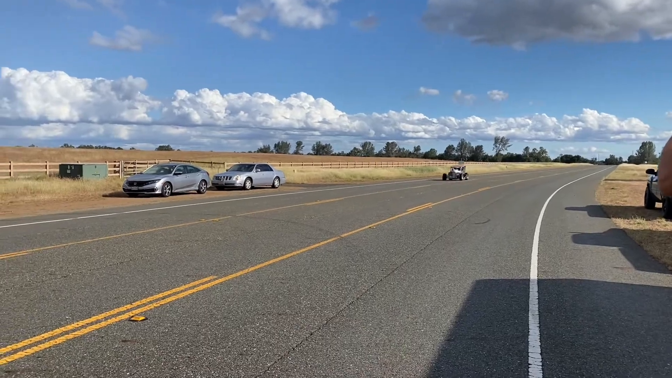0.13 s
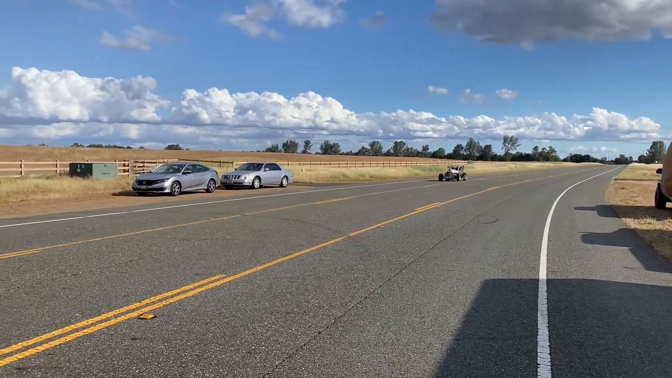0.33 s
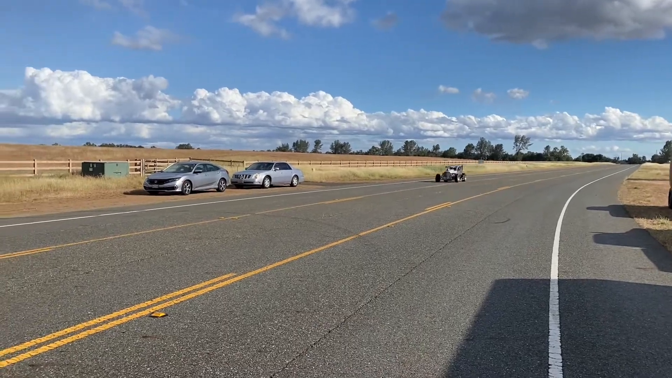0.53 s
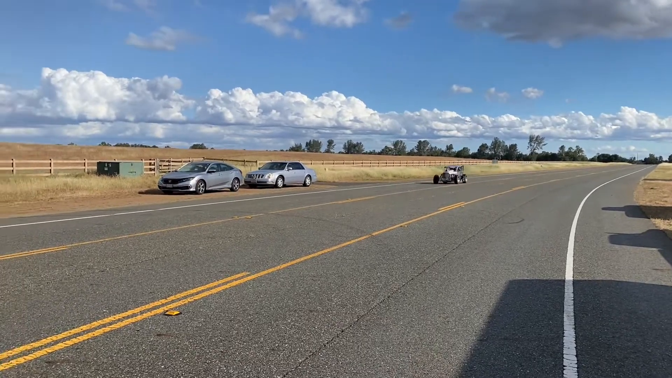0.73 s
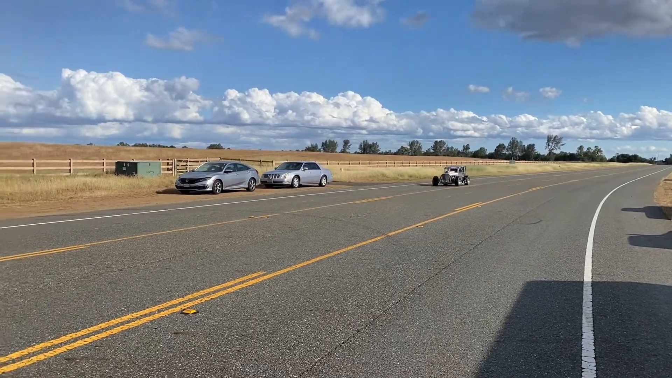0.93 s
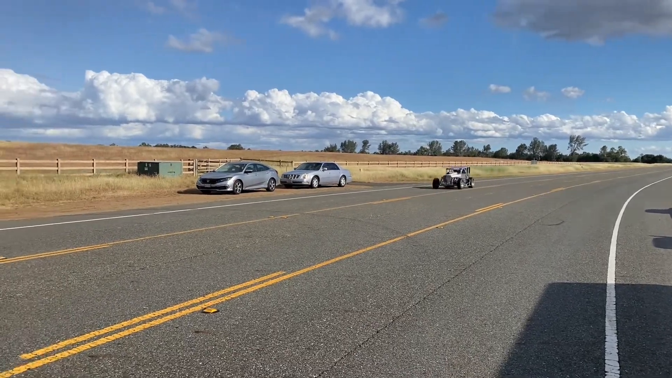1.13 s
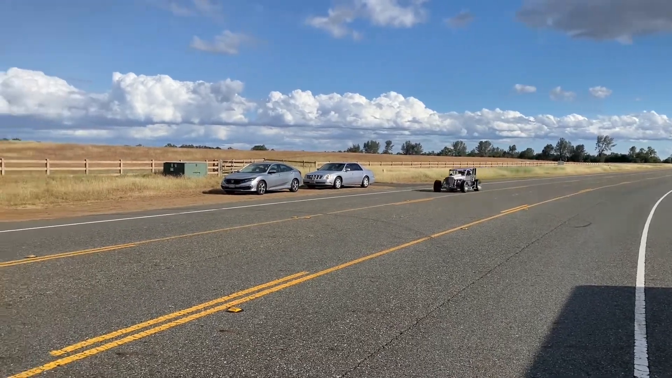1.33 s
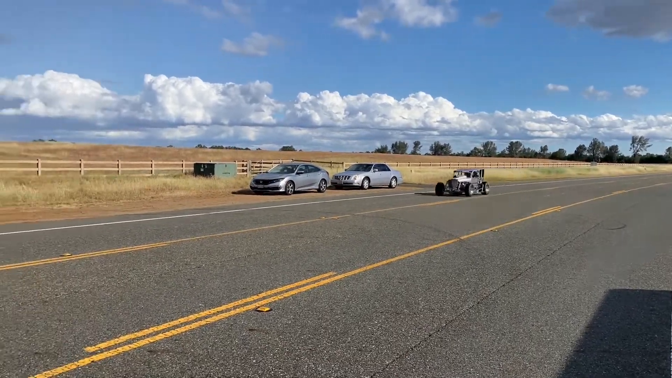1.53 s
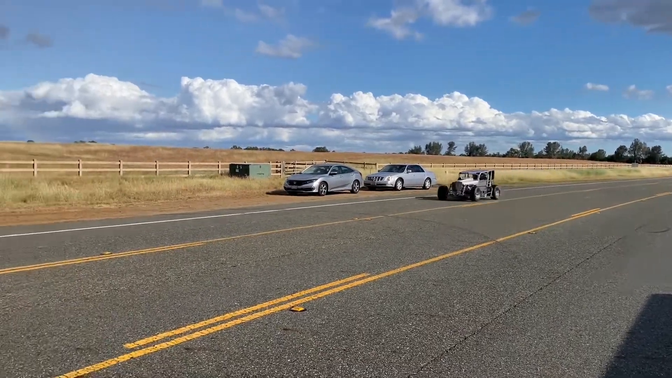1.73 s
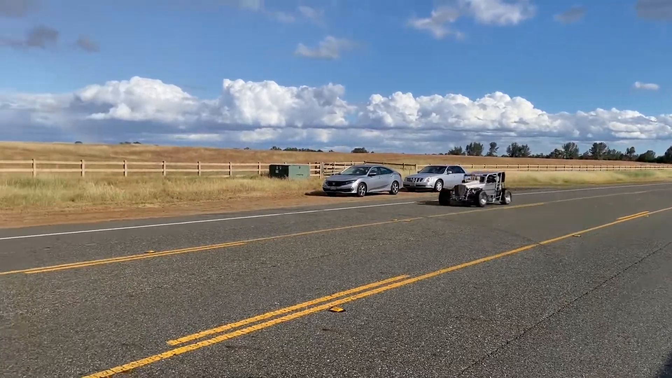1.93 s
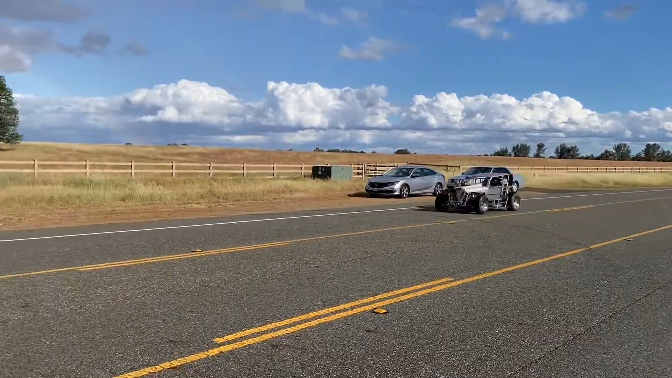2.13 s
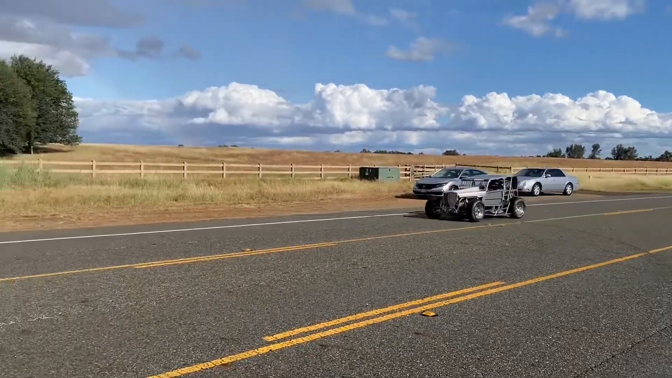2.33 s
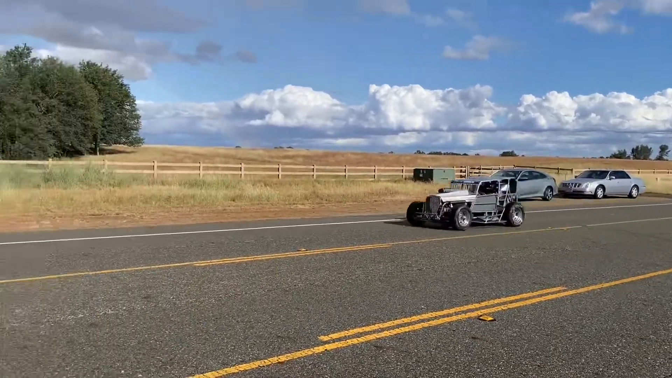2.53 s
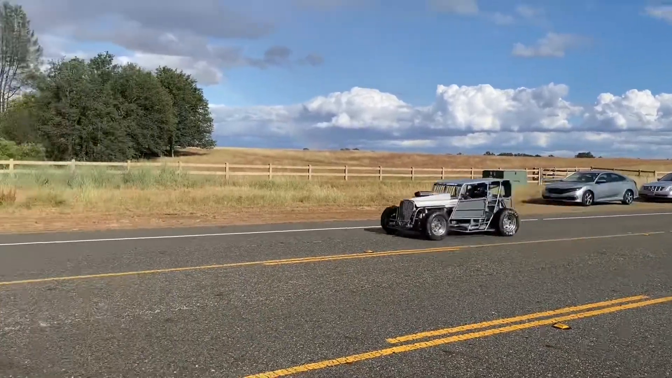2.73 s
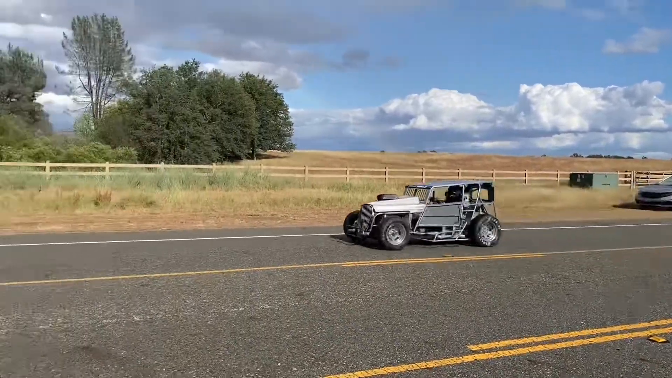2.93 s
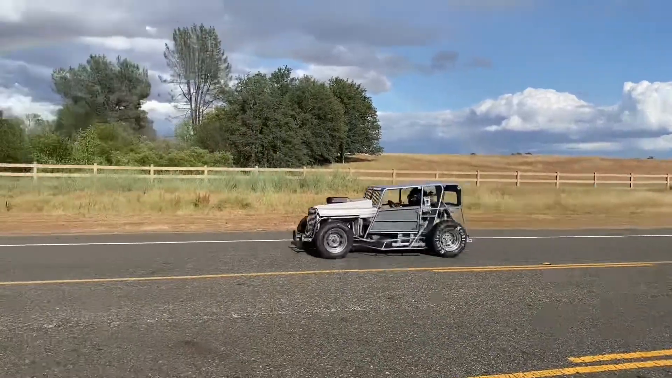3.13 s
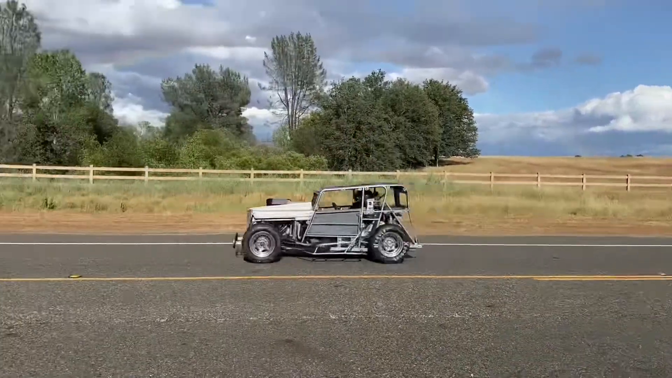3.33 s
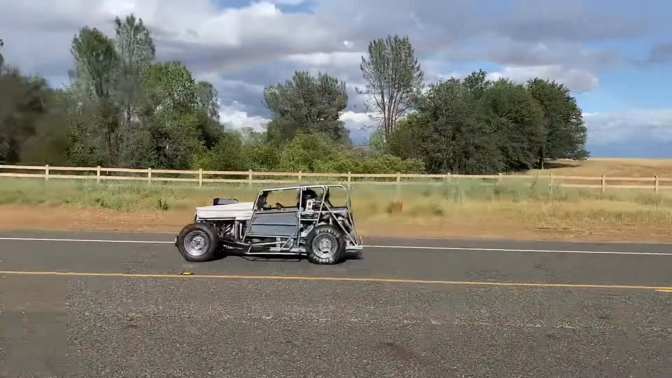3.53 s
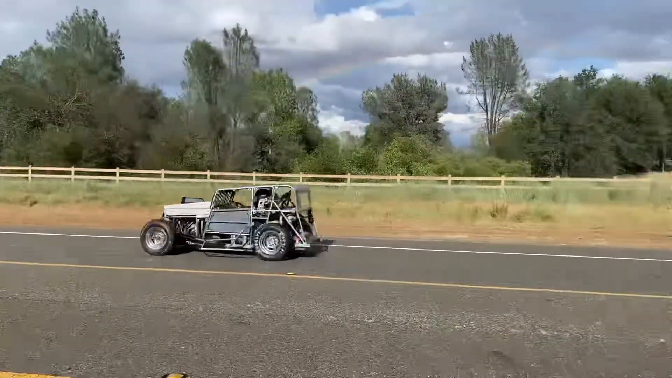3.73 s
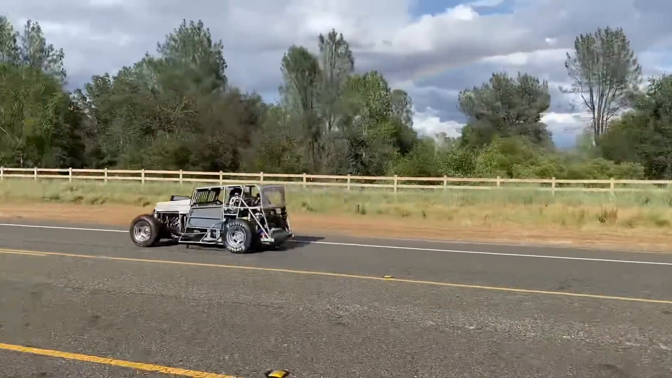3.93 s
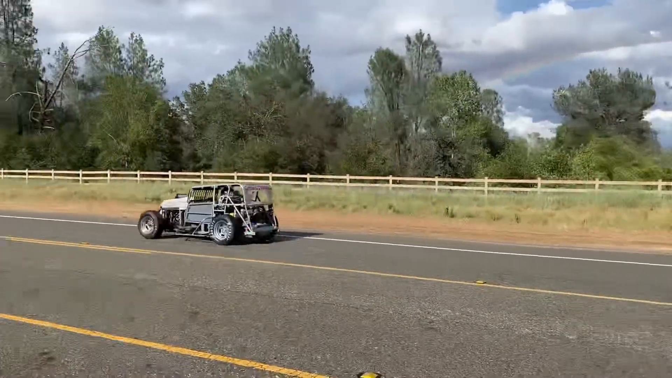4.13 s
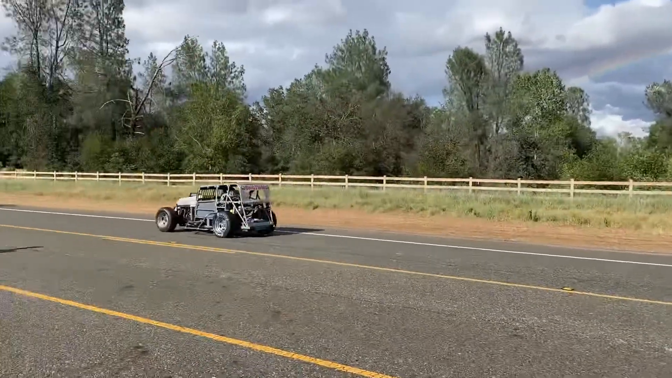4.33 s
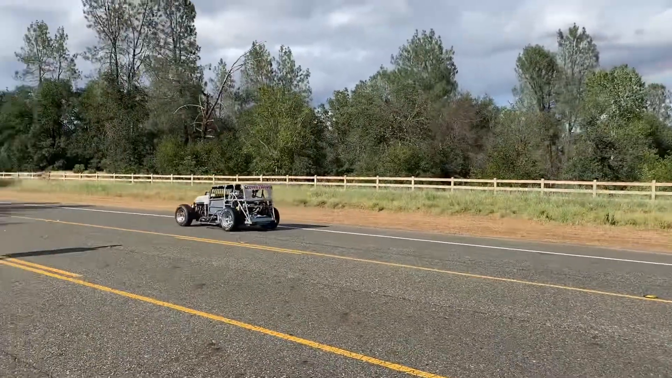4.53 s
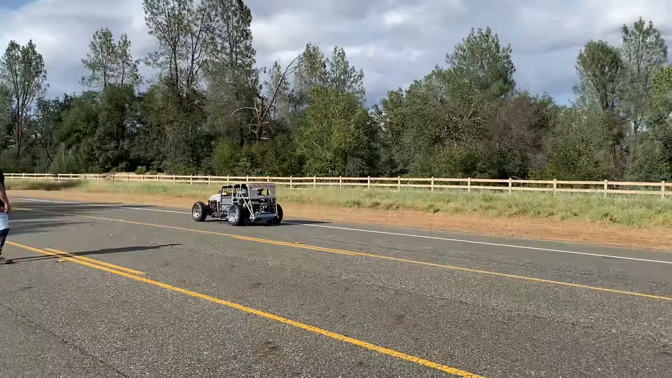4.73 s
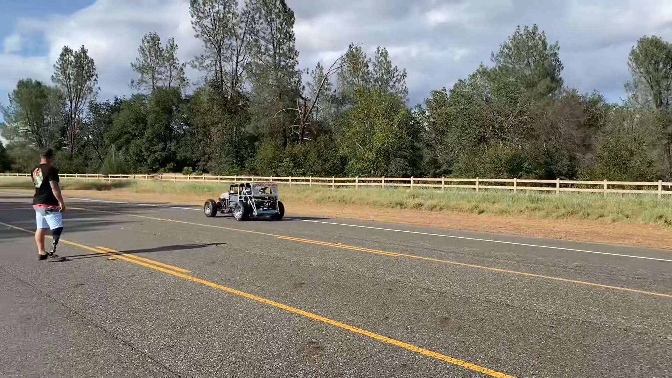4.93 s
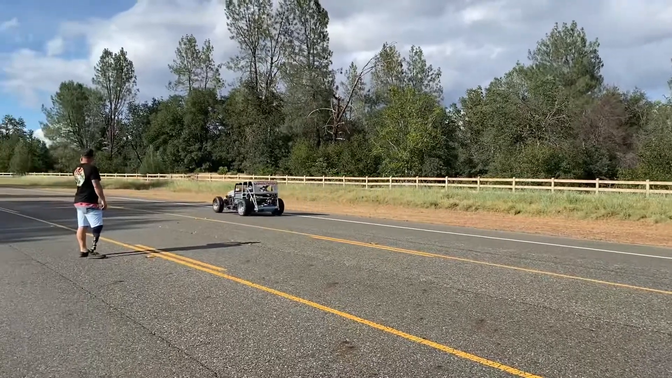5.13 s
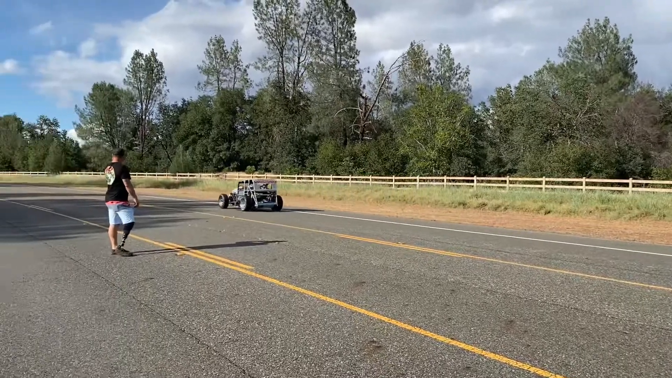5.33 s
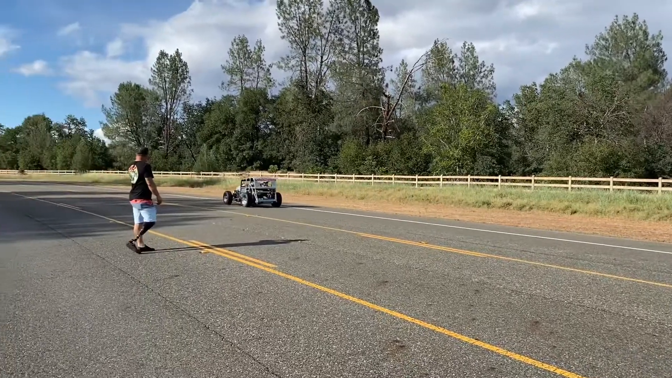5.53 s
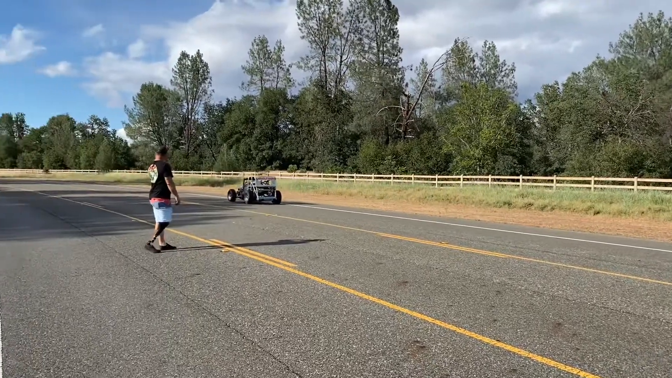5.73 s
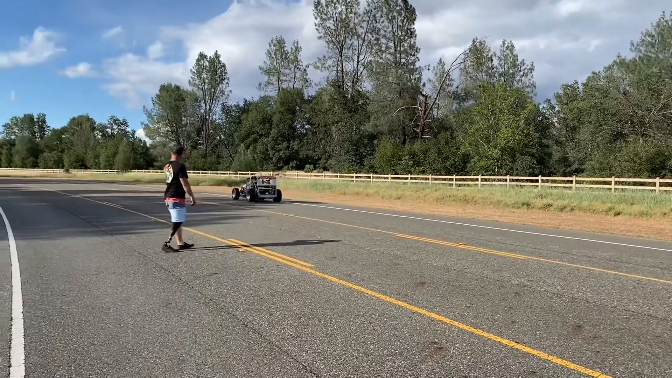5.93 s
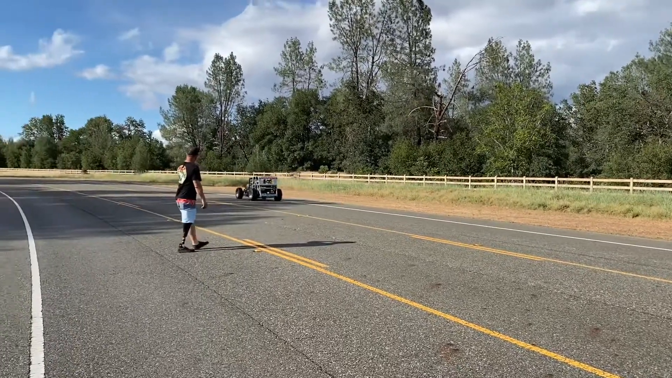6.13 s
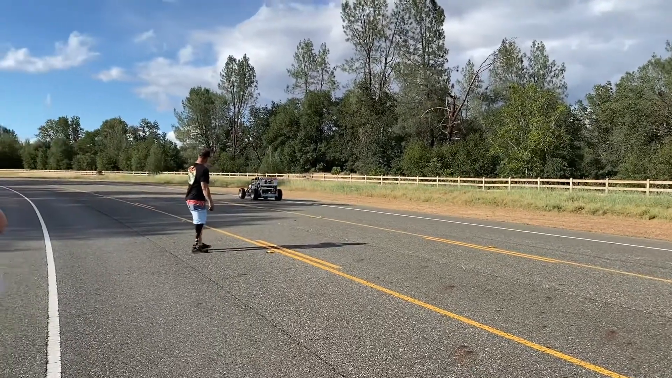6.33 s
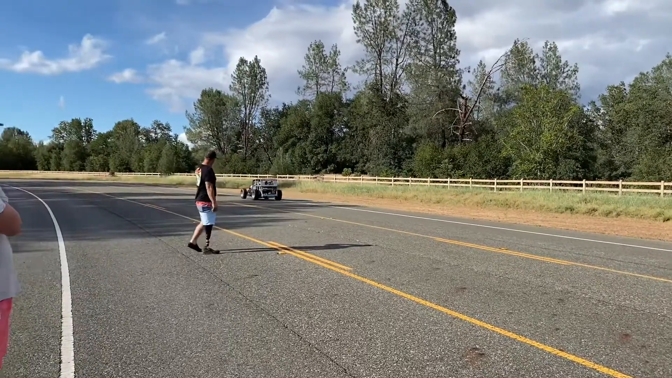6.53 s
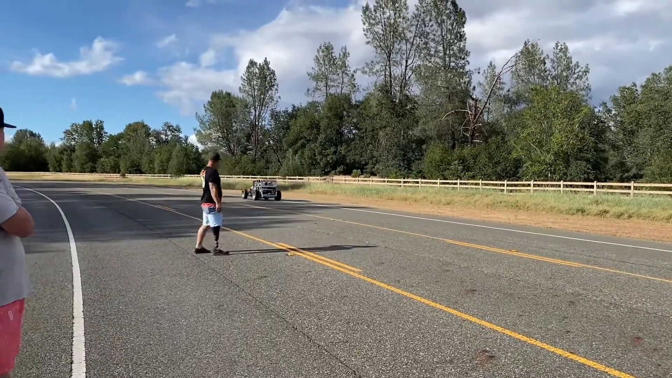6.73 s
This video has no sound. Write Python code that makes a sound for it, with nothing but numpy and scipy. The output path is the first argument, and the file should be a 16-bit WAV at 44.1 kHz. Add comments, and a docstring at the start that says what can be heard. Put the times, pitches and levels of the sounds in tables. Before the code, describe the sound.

A small race car with a raspy bike engine passes on an open road, its note falling, popping at a shift, then coasting and backfiring.

```python
"""Race car passing on the overrun

A small race car with a four-cylinder bike engine slows on the overrun as it passes right to left on an open road.
Cosines make the gliding firing note; clicks and puffs ring the pipes; shaped noise makes hiss and open-air hush.
Short pushes ring the silencer as unburnt fuel pops at the gear changes, and a backfire sweeps down in pitch.
Sines make the gear whine while the clutch is out and the bumps of light wind; two close microphone ports hear it."""
import sys
import numpy as np
from scipy import signal
from scipy.fft import rfft, irfft
from scipy.io import wavfile
from scipy.ndimage import uniform_filter1d

SR = 44100
rng = np.random.default_rng(int(sys.argv[2]) if len(sys.argv) > 2 else 0)


def log_audio(samples):
    """Write samples as a 16-bit WAV file to the path given in sys.argv[1]."""
    # one column per channel
    frames = np.atleast_2d(samples).T
    # limit to full scale, then quantise
    limited = np.clip(frames, -1, 1)
    pcm = np.round(limited * 32767).astype(np.int16)
    wavfile.write(sys.argv[1], SR, pcm)


N = 303408
T = np.arange(N) / SR  # s


def undb(db):
    """Decibels to a gain."""
    return 10 ** (np.asarray(db) / 20)


def unit(x):
    """Scale to rms 1."""
    return x / np.sqrt(np.mean(x ** 2))


def curves(table):
    """Columns of a table as straight lines in time."""
    s, *columns = np.transpose(table)
    return [np.interp(T, s, c) for c in columns]


def ring(x, modes):
    """Sum of steep resonances (two peak filters each), alternating in sign."""
    out = 0
    for k, (hz, width, db) in enumerate(modes):
        b, a = signal.iirpeak(hz, hz / width, SR)
        once = signal.lfilter(b, a, x)
        out = out + (-1) ** k * undb(db) * signal.lfilter(b, a, once)
    return out


def noise(spectrum, grain=0):
    """White noise plus any grain, shaped by a spectrum of (Hz, dB) points to rms 1."""
    hz, db = np.transpose(spectrum)
    f = np.fft.rfftfreq(N, 1 / SR) + 1  # 1 Hz up, to keep the log finite
    shape = undb(np.interp(np.log(f), np.log(hz), db))
    return unit(irfft(rfft(rng.standard_normal(N) + grain) * shape, N))


def walk(rate):
    """Random levels held 1 / rate s and slewed twice; spread near 1."""
    steps = 16  # points per held level
    held = np.repeat(rng.standard_normal(int(N * rate / SR) + 2), steps)
    slewed = uniform_filter1d(uniform_filter1d(held, steps), steps)
    return 1.34 * np.interp(T * rate * steps, np.arange(len(held)), slewed)


def gate(start, length):
    """Rises to 1 for the length in seconds, with soft edges."""
    edge_s = 0.015
    return np.clip(np.minimum(T - start, start + length - T) / edge_s + .5, 0, 1)


def swell(start, length):
    """Samples of a span in seconds and a smooth rise and fall over it."""
    at = slice(max(int(start * SR), 0), int((start + length) * SR))
    return at, np.sin(np.pi * ((T[at] - start) / length).clip(0, 1))


PASS_S, SPEED_M_S, KERB_M = 3.02, 9.9, 10.3  # moment, speed and distance of the nearest point


def passing():
    """Straight drive-by: metres along the road from the nearest point, and distance in metres."""
    along = SPEED_M_S * (T - PASS_S)
    return along, np.hypot(along, KERB_M)


def facing(db):
    """A level that turns with the car, from dB at (coming, alongside, leaving)."""
    along, r = passing()
    return np.interp(along / r, [-1, 0, 1], db)


def road(x, gain):
    """Road echo: a copy of the sound, most delayed when the car is near."""
    echo_ms = 0.76  # lag with the car alongside
    lag_s = echo_ms / 1000 * KERB_M / passing()[1]
    return x + gain * np.interp(T - lag_s, T, x)


# The engine stumbles and the note drops out. Each row: start in seconds, length in seconds, depth in dB
# (the note takes it once, the overtones and the hiss a multiple of it).
STUMBLES = [(2.377, 0.068, 0), (2.578, 0.087, -1), (6.312, 0.176, -11)]


def stumble_db():
    """Level lost while the engine stumbles, in dB."""
    return sum(db * gate(s, length) for s, length, db in STUMBLES)


# Exhaust note as heard, before swings, surges and stumbles. Each row: time in seconds, firing rate in Hz,
# note level in dB rms before the mix lift, twice the firing rate in dB against the note.
NOTE = [(0, 184.6, -19, -2), (.43, 174.9, -18, -4.5), (.86, 166.1, -16.5, -8.5), (1.29, 155.6, -15.5, -7.5),
        (1.72, 147.6, -14.5, -7.5), (1.93, 143.1, -13.5, -10), (2.16, 138.7, -21.5, 7.5),
        (2.36, 134.7, -20.5, 0.5), (2.7, 129.4, -16.5, -5.5), (3.07, 125.1, -14, -11.5),
        (3.41, 117, -12.5, -2.5), (4.05, 107.5, -16, -2), (4.59, 100.8, -18.5, -7), (4.75, 98.3, -17, -11),
        (4.91, 72.1, -21.5, -9), (5.05, 58, -28, -4.5), (5.45, 54.6, -59, -26), (5.83, 49.6, -49, 2),
        (5.93, 66.54, -30.5, -2.5), (5.99, 84.8, -20, -32), (6.03, 94.5, -23, -9),
        (6.065, 94.1, -22.5, -13), (6.124, 88.1, -21.5, -21), (6.29, 89.9, -21, -7.5),
        (6.45, 81.25, -23, -17), (6.88, 81.8, -22, -15.5)]
# Fuel lights in the pipe: the rate jumps and the third harmonic honks.
# Each row: start in seconds, length in seconds, rise of the rate in Hz, honk in dB.
SURGES = [(2.47, .094, 10, 14), (6.503, .11, 6, -0.5)]
OVERTONE_STUMBLE = 16  # overtones drop this many times the dB depth
# the driveline winds up as the clutch bites and the rate swings
BITE_S, SWING_HZ, SWING_PERIOD_S, SWING_FADE_S, SWING_DULL_DB_PER_HZ = 2.62, 9.04, 0.1493, 0.27, 4.5
TAIL_SHOWS_S, TAIL_TURN_S = 1.89, 0.38  # the pipe's mouth comes into view
THIRD_DB = (-33.5, -6)  # third harmonic against the note: (mouth hidden, mouth in view)
THIRD_KNEE_HZ, THIRD_SAG_DB_PER_HZ = 262, .35  # below the knee the pipe passes the third harmonic less


def engine():
    """Firing rate in Hz and the levels in dB of the note and its second and third harmonics."""
    hz, first, second = curves(NOTE)
    since = (T - BITE_S).clip(0)
    swing = -SWING_HZ * np.sin(2 * np.pi * since / SWING_PERIOD_S) * np.exp(-since / SWING_FADE_S)
    drop = stumble_db()
    rise = sum(up * gate(s, length) for s, length, up, _ in SURGES)
    honk = sum(db * gate(s, length) for s, length, _, db in SURGES)

    shows = .5 + .5 * np.tanh((T - TAIL_SHOWS_S) / TAIL_TURN_S)
    third = THIRD_DB[0] + shows * (THIRD_DB[1] - THIRD_DB[0])
    third = third + honk - SWING_DULL_DB_PER_HZ * swing.clip(0)
    third = third - THIRD_SAG_DB_PER_HZ * (THIRD_KNEE_HZ - 3 * (hz + rise)).clip(0, 18)
    overtone = first + OVERTONE_STUMBLE * drop
    return hz + swing + rise, first + drop, overtone + second, overtone + third


# Weaker lines between and above the overtones, from uneven cylinders.
# Each row: multiple of the firing rate, level in dB under the summed harmonics, before tilt and waver.
UNEVEN = [(.75, -23.5), (1.25, -19.5), (1.75, -30.5), (2.25, -29.5), (2.502, -30.5), (2.748, -30),
          (3.25, -32), (4, -26), (5, -27.5), (5.75, -43), (6, -29.5), (7, -30.5)]
WEAK_TILT_DB = (0, -0.5, -1)  # per multiple: (coming, alongside, leaving)
SPREAD = .05  # the pipe holds back higher overtones: cycles times the square of their number


def note(turns, levels_db):
    """Clean harmonics of the firing rate, with wavering weak lines from uneven cylinders."""
    clean = 0
    for k, db in enumerate(levels_db):
        phase = (k + 1) * turns - SPREAD * k ** 2
        clean = clean + undb(db + 0.1 * walk(40)) * np.cos(2 * np.pi * phase)
    loud = np.sqrt(sum(undb(db) ** 2 for db in levels_db))

    tilt = facing(WEAK_TILT_DB)
    weak = 0
    for m, db in UNEVEN:
        phase = m * turns + 0.29 * walk(10)
        weak = weak + undb(db + m * tilt + 3.3 * walk(8)) * np.cos(2 * np.pi * phase)
    return np.sqrt(2) * (clean + loud * weak)


# Looseness of the firing. Each row: time in seconds, unsteadiness as a share of the firing interval
# (scales a random drift), share of the cylinder lag heard.
WOBBLE = [(1.2, .003, 1), (1.9, .015, .3), (3, .008, .65)]
# Strength of each cylinder in turn. Each entry: level in dB, before chance.
CYLINDER_DB = [-2, 0, 0, -2]
# Lateness from unequal header pipes. Each entry: share of a firing interval, for each cylinder in turn.
CYLINDER_LAG = [0, -.025, -.05, -.075]


def firings(turns, jitter, scatter_db):
    """One click a firing, sized by its cylinder and by chance, split over two samples."""
    count = int(turns[-1])
    chance = rng.standard_normal((2000, 2))[:count].T
    number = np.arange(count)
    lag = np.resize(CYLINDER_LAG, count) * np.interp(number, turns, curves(WOBBLE)[1])
    at = np.interp(number + lag + jitter * chance[0], turns, np.arange(N - 0.)).clip(0, N - 2)
    size = undb(np.resize(CYLINDER_DB, count) + scatter_db * chance[1])
    out, whole = np.zeros(N), at.astype(int)
    np.add.at(out, whole, size * (1 - at + whole))
    np.add.at(out, whole + 1, size * (at - whole))
    return out


def rasp(turns, hz, modes, rough, jitter):
    """Firings and their puffs of gas ring a pipe; the level is kept even as the rate falls."""
    puff = np.exp(-(turns % 1) / 0.94) * rng.standard_normal(N)
    clicks = firings(turns, jitter, scatter_db=3.0) / np.sqrt(hz)
    return unit(unit(ring(clicks, modes)) + rough * unit(ring(puff, modes)))


# Base levels of gas and pipes. Each row: time in seconds, hiss in dB,
# rasp of the exhaust in dB against the hiss, howl of the intake in dB against the hiss.
HISS = [(0, -34, 1.5, 4), (.4, -32, 2.5, 0), (.7, -29, -3.5, 0), (1, -28.5, -5, 2.5), (1.3, -27.5, -2, -9),
        (1.7, -27, -0.5, 1), (2.1, -27, 1.5, 6.5), (2.5, -27.5, 7.5, 6.5), (2.65, -34, 2, 5),
        (2.9, -29.5, -8.5, 2), (3.4, -26, -5.5, -21), (3.7, -27, -1, -17), (4, -32, 4, 12),
        (4.68, -33, 3.5, 11), (4.94, -41, -7, 0), (5.1, -46.5, -4, -2), (5.7, -57.5, -1, -4),
        (6.07, -41, -5, -2), (6.29, -41, 2, -2), (6.315, -45.5, -5, 0), (6.37, -41, -6, 2),
        (6.55, -41.5, -3, 2), (6.88, -46, -14, 2)]


def gas_levels():
    """Hiss, rasp and howl levels in dB over time."""
    return curves(HISS)


# Resonances of the exhaust manifold. Each row: centre in Hz, width in Hz, relative level in dB.
MANIFOLD = [(533, 16, -9), (589.4, 35, 4), (710.5, 120, 2.5), (886, 93, -0.5), (1011, 118, -2),
            (1268, 345, -5)]
# Resonances of the tailpipe. Each row: centre in Hz, width in Hz, relative level in dB.
TAILPIPE = [(776, 33, -17), (867, 59, 0), (928, 146, -1.5), (1013, 154, 0), (1507, 160, -20.5)]
# Resonances of the intake. Each row: centre in Hz, width in Hz, relative level in dB.
INTAKE = [(1693, 66, -9), (1829, 144, 4.5), (2110, 155, -11), (2580, 100, -11.5), (3144, 170, -13.5),
          (4260, 67, -15)]
# added to the rasp and howl levels: (coming, alongside, leaving)
MANIFOLD_DB, TAIL_DB, INTAKE_DB = (1, 2, -9.5), (-8.5, -2.5, 1.5), (-1, -17, -30)
LIT_DB = -19  # under this note level the pipes fall silent with the note


def pipes(shaky, hz, note_db):
    """Firings ring manifold, tailpipe and intake, each turned with the car and echoed off the road."""
    hiss_db, rasp_db, howl_db = gas_levels()
    lit_db = hiss_db + (note_db - LIT_DB).clip(-30, 0)
    manifold = rasp(shaky, hz, MANIFOLD, rough=.15, jitter=.002)
    tail = rasp(shaky, hz, TAILPIPE, rough=.25, jitter=.004)
    intake = rasp(shaky, hz, INTAKE, rough=.15, jitter=.002)
    out = undb(rasp_db + facing(MANIFOLD_DB) + walk(6.2)) * manifold
    out = out + undb(rasp_db + facing(TAIL_DB)) * tail
    out = out + undb(howl_db + facing(INTAKE_DB)) * intake
    return road(undb(lit_db) * out, gain=0.15)


# Single lines that sing out for a while as a pipe or panel faces the ports.
# Each row: start in seconds, length in seconds, multiple of the firing rate, dB rms at the crest before waver.
SINGING = [(-.6, 1.9, 4.25, -29), (-.3, .95, 10.25, -39), (.6, .8, 11.25, -33), (.6, 1, 11, -44),
           (.55, .45, 6.25, -31), (.55, .4, 7.25, -40), (.9, .9, 8.25, -39), (.9, .8, 4.75, -32),
           (1.3, .75, 8.5, -35), (1.5, .9, 2.5, -31), (1.5, .9, 6.5, -39), (3, .65, 5, -37),
           (3.05, .8, 6.25, -36), (2.95, 1.1, 7, -37), (2.95, 1.7, 8, -38), (3.8, .9, 9, -37),
           (4, .9, 10, -36), (3.5, 1.5, 4, -35), (4.4, .5, 5, -36), (6.02, .35, 4, -34),
           (5.98, .35, 5, -43)]


def singing(turns):
    """Clean lines on the firing rate that come and go, wavering a little."""
    out = np.zeros(N)
    for s, length, m, db in SINGING:
        at, shape = swell(s, length)
        loud = np.sqrt(2 * shape) * undb(db + 1.5 * walk(10)[at])
        out[at] += loud * np.cos(2 * np.pi * (m * turns + .1 * walk(12))[at])
    return out


def gas(turns, spectrum, depth, grain=0):
    """Hiss of gas, chain and tyres, throbbing with each firing and heard again off the road."""
    throb = 1 + depth * np.cos(2 * np.pi * turns)
    flicker = undb(1.2 * walk(30) + 0.5 * walk(8.7))
    return road(noise(spectrum, grain) * throb * flicker, gain=0.01)


# Colour of the broad hiss. Each row: frequency in Hz, relative density in dB per Hz.
GAS = [(90, -42), (160, -16.5), (320, -8), (520, -22.5), (900, -14.5), (1300, -20), (2000, -24),
       (3000, -25.5), (5500, -31), (7000, -38), (9000, -53.5)]
# Colour of the bright sizzle. Each row: frequency in Hz, relative density in dB per Hz.
SIZZLE = [(3000, -53), (5500, -6.5), (7300, 3.5), (10500, -1.5), (12400, -4.5), (13000, -12), (15500, -53)]
SIZZLE_DB = (-6.5, -14, -14)  # against the hiss, before the air: (coming, alongside, leaving)
AIR_DB_PER_M = -0.1464  # the air dulls the sizzle
HISS_STUMBLE = 0.24  # share of a stumble's depth in the hiss


def hiss(turns, grain):
    """Broad gas noise with firings in it, plus a sizzle that fades with distance."""
    level_db = gas_levels()[0] + HISS_STUMBLE * stumble_db()
    sizzle_db = facing(SIZZLE_DB) + AIR_DB_PER_M * passing()[1]
    broad = gas(turns, GAS, depth=0.057, grain=grain)
    return undb(level_db) * (broad + undb(sizzle_db) * gas(turns, SIZZLE, depth=0.12))


# Resonances of the silencer. Each row: centre in Hz, width in Hz, relative level in dB.
SILENCER = [(93, 96, 2), (315, 105, 2.5), (401, 197, -1), (760, 210, -11), (1160, 290, -27.5)]
# Runs of small burbling pops. Each row: start in seconds, length in seconds, level in dB.
BURBLES = [(2.366, 0.017, -15), (2.431, 0.019, -3), (2.46, 0.125, -13.5), (2.576, 0.06, -20.5),
           (6.281, 0.046, -29), (6.464, 0.14, -35)]
BURBLE_DB = (-9, -7.5, 6.5)  # steady burble against the hiss: (coming, alongside, leaving)


def burble(rate=400):
    """Scattered small pops of uneven size, on average rate a second, ring the silencer."""
    small = (rng.random(N) < rate / SR) * rng.standard_normal(N)
    steady = undb(gas_levels()[0] + facing(BURBLE_DB))
    runs = sum(undb(db) * gate(s, length) for s, length, db in BURBLES)
    return unit(ring(small, SILENCER)) * (steady + runs)


# Colour of the open-air hush. Each row: frequency in Hz, relative density in dB per Hz.
HUSH = [(20, -42), (35, -9), (90, -30), (185, -1), (290, -11), (385, -5.5), (600, -20), (1050, -13.5),
        (1250, -34), (1500, -22.5), (2000, -30), (4000, -38), (8000, -71), (15500, -55)]


def hush():
    """Steady open-air noise, its level drifting a little around -40.5 dB."""
    return undb(-40.5 + 2.0 * walk(4.65)) * noise(HUSH)


# Bands of the rasp that swell for a while.
# Each row: start in seconds, length in seconds, centre in Hz, width in Hz, dB rms at the crest.
SWELLS = [(.75, 1, 3780, 110, -42), (.5, .8, 3060, 120, -46), (1.3, .9, 2720, 150, -42),
          (1.45, .8, 3150, 260, -41), (2.475, .095, 1250, 400, -24), (2.47, .105, 1900, 250, -31),
          (2.75, .95, 1940, 160, -43), (2.75, .7, 4900, 200, -49), (3.45, .45, 3650, 300, -46),
          (3.55, .7, 1660, 300, -40), (1.75, .55, 2000, 450, -40), (2.3, .3, 3300, 150, -46),
          (5.22, .05, 2300, 120, -52), (6.4, .11, 2150, 800, -43)]


def swells(turns):
    """Narrow bands of firings and gas that rise and fall."""
    out = np.zeros(N)
    raw = unit(firings(turns, jitter=.002, scatter_db=2)) + .8 * rng.standard_normal(N)
    for s, length, hz, width, db in SWELLS:
        at, shape = swell(s, length)
        out[at] += undb(db) * shape * unit(ring(raw[at], [(hz, width, 0)]))
    return out


# Wind bumping the ports. Each row: start of the sine in seconds, peak of its envelope in dB.
BUMPS = [(1.83, -27), (1.989, -23), (2.049, -21), (2.372, -16), (2.489, -31.5)]
BUMP_HZ = 62


def bumps(width_s=0.015):
    """Soft low thumps of air: a sine under a bell-shaped envelope."""
    out = 0
    for s, db in BUMPS:
        bell = np.exp(-((T - s - width_s) / width_s) ** 2)
        out = out + undb(db) * bell * np.sin(2 * np.pi * BUMP_HZ * (T - s))
    return out


# Bright resonances of a blast's edge. Each row: centre in Hz, width in Hz, relative level in dB.
CRACK = [(770, 59, -17), (1044, 256, 24), (2110, 790, 7), (3600, 1600, -7), (4900, 360, -16),
         (6800, 530, -9)]


def crack(t, length_s):
    """The sharp edge of a blast: a spit of noise in the bright resonances, peak 1."""
    burst = np.exp(-np.abs(t) / length_s) * (t >= 0)
    spit = ring(rng.standard_normal(len(t)) * burst, CRACK)
    return spit / np.abs(spit).max()


# Pops of unburnt fuel. Each row: start in seconds, peak of the silencer's ring in dB, push length in ms.
POPS = [(2.367, 2, 0.94), (2.391, -1.5, 2.7), (2.412, -1.5, 1.3), (2.426, -3.5, 0.57), (2.435, -15, 0.48),
        (2.475, -7, 0.73), (2.483, -20, 0.63), (2.501, -8.5, 0.36), (2.521, -9, 0.5), (2.542, -7, 0.57),
        (2.556, -9, 0.67), (4.869, -29, 1.8), (4.989, -25.5, 0.55), (5.145, -37, 0.7), (5.225, -28, 0.45),
        (5.242, -29, 0.49), (6.354, -21, 2.1), (6.372, -21.5, 1.7), (6.418, -17.5, 3.04), (6.447, -21, 1.7),
        (6.471, -12.5, 2), (6.497, -12, 2.5), (6.52, -9, 2.16), (6.545, -20, 2.13), (6.566, -8.5, 2.2),
        (6.591, -17, 2.64), (6.71, -7, 2.27)]
CRACK_DB, CRACK_DB_PER_MS = 4.5, -15  # a longer push cracks less


def pops():
    """Each pop is a short push that rings the silencer; a longer push sounds duller."""
    out, t = np.zeros(N), np.arange(SR // 10) / SR
    for s, db, push_ms in POPS:
        push = np.sin(np.pi * (1000 * t / push_ms).clip(0, 1)) ** 2
        rung = ring(push, SILENCER)
        edge = undb(CRACK_DB + CRACK_DB_PER_MS * push_ms) * crack(t, length_s=0.012)
        out[int(s * SR):][:len(t)] += undb(db) * (rung / np.abs(rung).max() + edge)
    return out


# Overtones of the gear whine. Each row: multiple of the whine's pitch, relative level in dB before waver.
WHINE_OVERTONES = [(1, 0), (2, -13)]
COAST_S = (5.25, 5.97)  # start and end
WHINE_HZ, WHINE_SAG_HZ_PER_S = 766, 142  # starting pitch and its fall
WHINE_DB, WHINE_SWELL_DB_PER_S = -51, 6  # starting level and its rise


def whine():
    """Gear teeth sing while the car coasts, sagging as it slows."""
    since = T - COAST_S[0]
    hz = WHINE_HZ - WHINE_SAG_HZ_PER_S * since.clip(0, 1)
    turns = np.cumsum(hz) / SR + 0.31 * walk(30)
    loud = gate(COAST_S[0], COAST_S[1] - COAST_S[0]) * undb(WHINE_DB + WHINE_SWELL_DB_PER_S * since)
    teeth = sum(undb(d + 2.5 * walk(25)) * np.sin(2 * np.pi * m * turns) for m, d in WHINE_OVERTONES)
    return np.sqrt(2) * loud * teeth


# One backfire. The row: start in seconds, level in dB, time to fall 60 dB in seconds.
BACKFIRE = (6.2763, 2, 0.042)


def backfire(turns=1.394, start_s=0.001, crack_db=-3):
    """A blast down the pipe: the highs leave first, the lows trail in a falling sweep."""
    s, db, t60 = BACKFIRE
    t = (T - s).clip(0)
    edge = signal.lfilter(*signal.butter(2, 2200, "high", fs=SR), crack(T - s, length_s=0.0015))
    sweep = np.sin(2 * np.pi * turns * np.log(1 + t / start_s)) * np.exp(-np.log(1000) * (t / t60) ** 2)
    body = signal.lfilter(*signal.butter(2, 2200, fs=SR), sweep)
    return undb(db) * (body + undb(crack_db) * edge)


# Lead of the engine's mids at the right port. Each row: time in seconds, lead in ms.
RIGHT_LEAD = [(.4, .08), (1.5, .2), (2.2, .28), (3, .05), (3.8, -.03)]
PAN_DB = (-1.5, -0.3, 0.55)  # left minus right: (coming, alongside, leaving)


def scene():
    """Mixes the car, wind and hush, then spreads direct and scattered sound over left and right."""
    hz, *levels_db = engine()
    turns = np.cumsum(hz) / SR  # firings so far
    shaky = turns + curves(WOBBLE)[0] * walk(30)
    low = undb(1.45) * note(turns, levels_db)
    piped = pipes(shaky, hz, levels_db[0]) + singing(turns) + swells(shaky)
    # firings heard through the hiss
    grain = .7 * unit(firings(shaky, jitter=.002, scatter_db=2) / np.sqrt(hz))
    blows = backfire() + pops() + burble()
    direct = low + piped + hiss(turns, grain) + blows + whine() + bumps() + hush()

    # sound scattered off the road and parked cars reaches the ports from the sides; rolls are in samples
    scattered = undb(-11.0) * np.roll(piped, 700)
    scattered += undb(-8.0) * hiss(turns, grain)
    scattered += undb(-20.0) * np.roll(blows, 60)
    scattered += undb(-18) * signal.lfilter(*signal.butter(2, 250, "high", fs=SR), np.roll(low, 300))
    # a slope of the mids, opposite in the two ports, acts as a small time lead
    mids = signal.filtfilt(*signal.butter(2, [170, 1600], "band", fs=SR), direct)
    scattered -= curves(RIGHT_LEAD)[0] / 1000 * SR / 2 * np.gradient(mids)
    pan = undb(np.array([[.5], [-.5]]) * facing(PAN_DB))
    return direct * pan + np.array([[1], [-1]]) * scattered


# Phase between the ports. Each row: frequency in Hz, lead of the left port in cycles.
PORT_LEAD = [(0, 0), (1700, .12), (4100, .03), (5600, .15), (7000, 0), (9000, -.5), (11000, -1),
             (13300, -1.5), (14600, -2), (16200, -2)]
# Balance between the ports. Each row: frequency in Hz, left minus right in dB.
PORT_TILT = [(0, 0), (120, -.5), (250, -.8), (500, 0), (1000, 1.5), (4000, 1.5), (8000, 0)]


def ports(x):
    """The two ports hear each pitch with its own lead and balance."""
    f = np.fft.rfftfreq(N, 1 / SR)
    lead = np.exp(1j * np.pi * np.interp(f, *np.transpose(PORT_LEAD)))
    turn = lead * undb(np.interp(f, *np.transpose(PORT_TILT)) / 2)
    return irfft(rfft(x) * np.array([turn, 1 / turn]), N)


TOP_HZ = 15700  # top of the recorded band


def record(dry):
    """The ports colour phase and balance, gain ducks after loud peaks, peaks are rounded, the top is cut."""
    mid, side = dry.mean(0), (dry[0] - dry[1]) / 2
    wet = ports(mid) + side * np.array([[1], [-1]])
    keep = np.exp(-1 / (.04 * SR))  # 40 ms smoothing
    excess = signal.lfilter([1 - keep], [1, -keep], (np.abs(mid) - .75).clip(0))
    wet = wet / (1 + 16 * excess)
    rounded = np.tanh(0.88 * wet) / 0.9
    return signal.sosfilt(signal.ellip(8, .2, 70, TOP_HZ, fs=SR, output="sos"), rounded)


dry = scene()
out = record(dry)
log_audio(out)
```